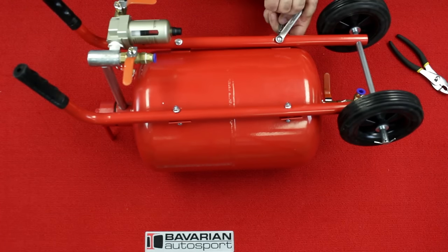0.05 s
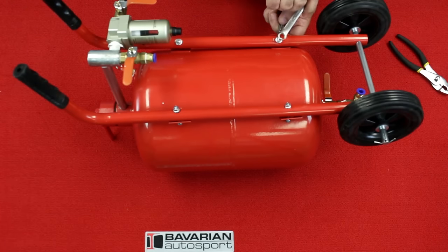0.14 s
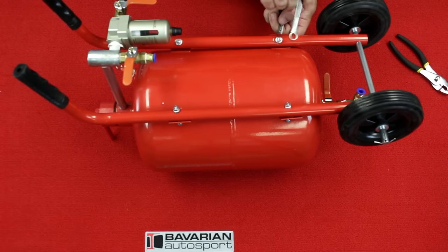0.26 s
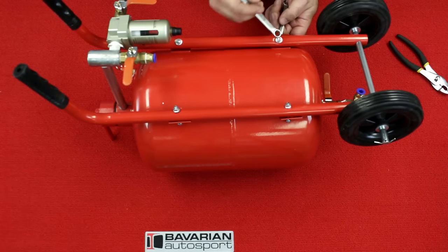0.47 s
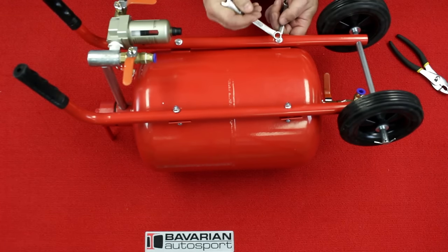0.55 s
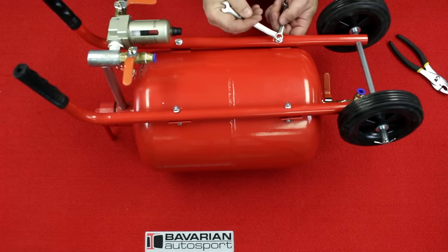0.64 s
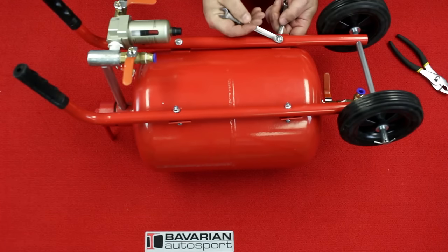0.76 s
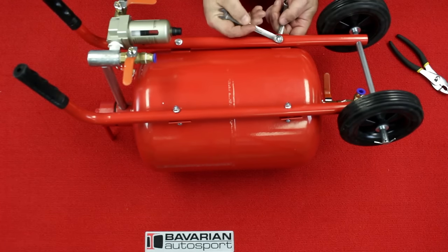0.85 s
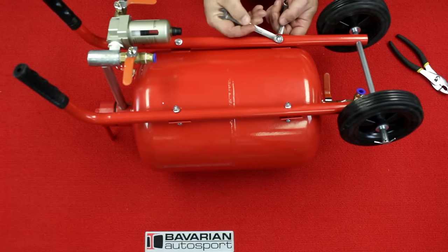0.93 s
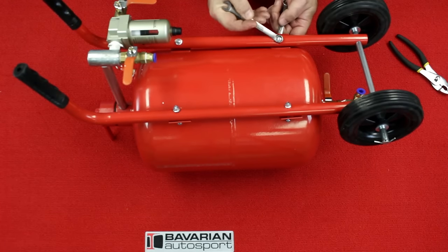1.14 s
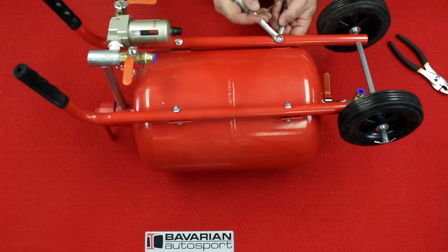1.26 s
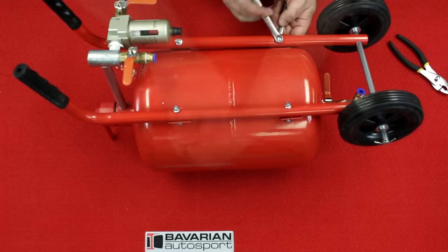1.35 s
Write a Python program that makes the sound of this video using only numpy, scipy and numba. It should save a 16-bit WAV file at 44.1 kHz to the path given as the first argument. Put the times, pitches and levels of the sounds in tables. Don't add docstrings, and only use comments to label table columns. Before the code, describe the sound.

Wrenches clink on a nut and bolt, a quick gritty rattle first, a near-quiet gap with a soft finger bump, then harder bright clanks and faint taps, close microphone in a small quiet workshop.

```python
import sys
import numpy as np
from scipy import signal
from scipy.fft import rfft, irfft
from scipy.io import wavfile
from scipy.ndimage import uniform_filter1d
from numba import njit

SR = 44100
rng = np.random.default_rng(int(sys.argv[2]) if len(sys.argv) > 2 else 0)


def output_pcm(signal):
    pcm = np.clip(np.atleast_2d(signal).T, -1, 1) * 32767
    wavfile.write(sys.argv[1], SR, np.round(pcm).astype(np.int16))


def rack_gain(trim_db):
    fader = np.asarray(trim_db, float)
    return 10 ** (fader / 20)


N = 61739

# f/Hz, density/dB per Hz
AIR = [(26, -23), (45, -3), (121, -9), (198, -10.5), (459, -18), (506, -17.5), (770, -22.5), (13900, -47.5),
       (16500, -42)]
# t/s, level/dB
RUMBLE = [(0.0, -70), (0.112, -56), (0.368, -61.5), (0.4, -51), (0.618, -68.5), (0.828, -66), (0.914, -59),
          (0.992, -63), (1.066, -59), (1.21, -65), (1.362, -54), (1.4, -46)]
# start/s, length/s, level/dB, centre f/Hz
BRUSHES = [
    (-0.18, 0.39, -76.5, 1450),
    (0.194, 0.65, -80, 12000),
    (0.28, 0.37, -69.5, 770),
    (0.975, 0.54, -76.5, 5300),
]
# t/s, level/dB, place (0 bolt end, 1 bracket, 2 seated nut), push/ms
KNOCKS = [(0.062, -65, 0.4, 0.28), (0.203, -39, 0.3, 0.56), (.208, -39.5, 0.58, 0.063),
          (.217, -36, 0.8, 0.32), (.235, -29.5, 0.058, 0.18), (.2495, -31.5, 0.7, 0.16),
          (.311, -47.5, .3, 0.79), (0.605, -71.5, 0.57, .3), (.755, -47.5, 1.9, 0.11),
          (0.764, -64, 1.9, 0.77), (.775, -36, 1.42, 0.78), (0.814, -33, 1.58, 0.11),
          (.841, -37.5, 1.9, 0.083), (0.893, -27.5, 1.01, 0.076), (0.925, -45, 0.5, 0.32),
          (0.244, -34.5, .3, 0.28), (0.262, -45, .5, 0.24), (0.806, -45.5, 1.8, 0.078),
          (.898, -35, 0.4, 0.32), (.962, -48, .8, 0.38)]
# f/Hz, level/dB from bolt end, from bracket, through seated nut, t60/s
FRAME = [(836, 2.5, 0.5, -6, 0.056), (874, -2.5, -15.5, -6, 0.22), (919, -11, -0.5, -14, 0.18),
         (974, 9.5, 0, -20, 0.1), (1009.7, 1, -6.5, -17, 0.16), (1067, -26, -18, -13, 0.13),
         (1271, 8.5, -18, -0.5, 0.074), (1326, -7, -7, -4, 0.19), (1390, -2.5, -6.5, -2.5, 0.18),
         (1551, -14, -7, -10.5, 0.27), (1628, -10, 7, -14.5, 0.054), (1705, -12, -6.5, -1.5, 0.046),
         (1900, -14, -19, -6, 0.18), (1640.6, -6, -10, -14, 0.29)]
# f/Hz, level/dB from bolt end, from bracket, through seated nut, t60/s
TANK = [(328, -15.5, -23.5, -19.5, 0.25), (345.2, -20.5, -23.5, -27.5, 1.0), (388, -22.5, -20, -27, 0.37),
        (431.5, -31.5, -16.5, -59, 0.51), (508, -8, -14.5, -14.5, 0.067), (591.7, -5, -5, -1, 0.075),
        (698, -13, -23, -27, 0.083)]
# t/s, level/dB, place (0 near bolt, 1 near wheel), push/ms
TAPS = [
    (1.071, -42, 0.049, 0.33),
    (1.09, -48.5, 0.15, 0.32),
    (1.099, -53.5, 0.54, .2),
    (1.148, -48, 0.52, 0.33),
    (0.139, -48, 0.43, 0.32),
    (1.21, -59, 0.53, 0.34),
    (1.297, -58.5, 0.46, 0.55),
    (1.316, -46, 0.77, 0.52),
    (1.347, -71, 1, 0.37),
]
# f/Hz, level/dB near bolt, near wheel, t60/s
TUBE = [(357.4, -5, -19, 0.21), (606, -9.5, -17, 0.15), (891, 3, -10, 0.15), (954, -2, -6, 0.26),
        (1001, -2.5, 10.5, 0.061), (1298, -7, -3, 0.22), (1390, -1, -8, 0.22), (1572, -5.5, -13, 0.18),
        (1650, 1.5, -3, 0.073), (1800, -2.5, -18, 0.17), (2000, -12, -22, .1), (2500, -5.5, -23, .1)]
# t/s, nut clink/dB, wrench ring/dB, scrape/dB, brightness/dB per octave
CLINKS = [(0.14, -74, -66, -68.5, -3), (0.207, -41, -66, -40.5, -17.5), (0.2175, -54, -53, -41, -0.5),
          (0.234, -35, -45, -39.5, -9), (.253, -47, -58, -45, -1.5), (.505, -85, -84, -66.5, -1),
          (.754, -30, -40, -41.5, -5.5), (.761, -38, -41, -46, -5.5), (0.7735, -39, -51.5, -43, -8.5),
          (.807, -29, -35.5, -34, -0.5), (.878, -54, -54, -62, -12), (1.07, -56, -69, -52.5, -9),
          (1.089, -57, -62, -54, -5), (1.319, -71, -81, -80, -4), (.258, -45, -53, -67, -6),
          (.263, -37, -63, -61, -14)]
# t/s, bolt clink/dB, wrench ring/dB, scrape/dB, brightness/dB per octave
HOLDS = [
    (0.84, -44, -48, -38.5, -0.5),
    (0.8931, -28.5, -33, -27.5, -0.8),
    (0.905, -52, -41, -47, -5),
    (0.925, -67, -55, -66, -7),
    (1.212, -88, -70, -59.5, -3.5),
]
# f/Hz, level/dB turning, level/dB holding, t60/s
WRENCH = [(2365, -11.5, -34, 0.21), (2511, -4, -10, 0.11), (2820, -15.5, -23, 0.19),
          (3213, -12, -1.5, 0.036), (3820, -19.5, 1.5, 0.052), (4500, -2.5, -24, 0.11),
          (4690, -3.5, 1, 0.072), (5020, -10, -20, 0.25), (5914, -8.5, 6, 0.057), (6238, 0, -2, 0.075),
          (7210, -6, -1, 0.065), (7470, 0.5, -14, 0.075), (8384, -10, 4, 0.028), (9390, -5, -31, 0.062)]
# f/Hz, level/dB, t60/s
NUT = [(6294, 1, 0.047), (6520, -14, 0.073), (8403, 0, 0.011), (10200, -3, 0.048), (10860, -0.5, 0.025),
       (9440, -11.5, .03), (11450, -4.5, 0.021), (12550, -12, 0.027), (14100, -16, 0.056),
       (15250, -12, 0.029)]
# f/Hz, level/dB, t60/s
BOLT = [(3327, -5, 0.022), (5928, -3, 0.012), (8396, 0.5, 0.032), (9900, -3, 0.028), (11570, -7, .03),
        (12140, -5, 0.026), (13160, -2, 0.021), (14100, -14, .04)]
# start/s, length/s, level/dB, brightness/dB per octave
DRAGS = [
    (0.203, 0.027, -56, -13),
    (0.226, 0.051, -51, 0.5),
    (1.064, 0.032, -65, 3),
    (1.2, 0.028, -79, 9),
]
# t/s, level/dB, f/Hz, t60/s
BUMPS = [
    (.452, -62, 325, .05),
    (0.504, -48, 283, 0.038),
    (0.515, -53, 126, 0.045),
]

AIR_DB, RUMBLE_HZ, RUMBLE_WIDTH_HZ, RUMBLE_NOISE_DB = -65, 28.15, 10.05, -13.5
PARTNER_DB, PARTNER_DECAY, PLACE_SCATTER_DB = -10.5, 0.88, 1.94
FRAME_SPLIT, FRAME_BUILD_S = 0.017, 0.0015
TOOL_SPLIT, TOOL_BUILD_S = 0.0343, 0.00056
THUD_DB, THUD_HZ, THUD_WIDTH_HZ, THUD_T60_S = -10, 1280, 1120, 0.12
RATTLE_GROWTH, HARD_KNOCK_DB = 0.48, -25.5
ROOM_DB, ROOM_T60_LOW_S, ROOM_T60_HIGH_S, ROOM_SPLIT_HZ, ROOM_GAP_S = -22, 0.53, 0.15, 2300, 0.0044
ROOM_FRAME_DB, ROOM_GRIT_DB, ROOM_THUD_DB = -5.5, 9, 10
SCRAPE_HZ, SCRAPE_WIDTH_HZ, SCRAPE_WIDE_DB, SCRAPE_Q = 4630, 4900, -1.5, 4.2
SCRAPE_T60_S, SHIVER_T60_S, SHIVER_DB, GRAIN_TOP_DB = 0.012, 0.16, -12, 8.5
MIC_TOP_HZ = 14700


def add(out, x, s):
    i = int(s * SR)
    out[i:i + len(x)] += x[:N - i]


def rise(t, build_s):
    return -np.expm1(-t / build_s)


def band(x, hz, width_hz):
    y = signal.lfilter(*signal.iirpeak(hz, hz / max(width_hz, 1), SR), x)
    return y / np.std(y)


@njit
def decaying(poles, gains, count):
    out = np.zeros(count)
    for k in range(len(poles)):
        z = gains[k]
        audible = int(np.log(abs(z) / 1e-6 + 1) / -np.log(abs(poles[k])))
        for i in range(min(count, audible)):
            out[i] += z.imag
            z *= poles[k]
    return out


def ring(hz, db, t60, split, build_s, count):
    chance = rng.standard_normal((3, len(hz), 3))
    level_chance, pitch_chance, phase_chance = np.moveaxis(chance, 2, 0)
    partner = np.array([[0], [1], [1]])
    db = db + PLACE_SCATTER_DB * level_chance + PARTNER_DB * partner
    detune = 1 + split * pitch_chance * np.maximum(partner, 0.08)
    hz = np.minimum(hz * detune, SR / 2)
    rate = np.log(1000) / (t60 * PARTNER_DECAY ** partner)
    poles = np.exp((2j * np.pi * hz - rate) / SR)
    gains = rack_gain(db) * np.exp(1j * np.pi * phase_chance)
    waves = decaying(poles.ravel(), gains.ravel(), count)
    return waves * rise(np.arange(count) / SR, build_s) / 2


def strike(rows, modes):
    out = np.zeros(N)
    modes = np.array(modes)
    for s, db, place, push_ms in rows:
        gains_db = np.array([np.interp(place, range(len(m) - 2), m[1:-1]) for m in modes])
        x = ring(modes[:, 0], gains_db + db, modes[:, -1], FRAME_SPLIT, FRAME_BUILD_S, count=20000)
        push = np.exp(-2000 / (max(push_ms, 0.01) * SR))
        add(out, signal.lfilter([1 - push], [1, -push], x), s)
    return out


def air():
    hz = np.maximum(np.arange(N // 2 + 1) * SR / N, 1)
    air_hz, air_db = np.array(AIR).T
    shape = rack_gain(np.interp(np.log(hz), np.log(air_hz), air_db)) * (hz > 40)
    hiss = irfft(rfft(rng.standard_normal(N)) * shape, N)
    drift = uniform_filter1d(rng.standard_normal(N), SR // 8)
    fan_hz = RUMBLE_HZ + RUMBLE_WIDTH_HZ / 2 * drift / np.std(drift)
    rumble = np.sqrt(2) * np.sin(2 * np.pi * np.cumsum(fan_hz) / SR)
    rumble = rumble + rack_gain(RUMBLE_NOISE_DB) * band(band(rng.standard_normal(N), 38, 34), 38, 34)
    rumble_db = np.interp(np.arange(N) / SR, *np.array(RUMBLE).T)
    return rack_gain(AIR_DB) * hiss / np.std(hiss) + rack_gain(rumble_db) * rumble


def brushes():
    out, t = np.zeros(N), np.arange(N) / SR
    for s, length_s, db, hz in BRUSHES:
        swell = np.sin(np.pi * np.clip((t - s) / length_s, 0, 1)) ** 2
        grain = rng.standard_normal(N) * rack_gain(2.7 * rng.exponential(size=N))
        out += rack_gain(db) * swell * band(grain, hz, hz)
    return out


def frame_knocks():
    return strike(KNOCKS, FRAME + TANK)


def thuds():
    out = np.zeros(N)
    t = np.arange(9000) / SR
    fade = rack_gain(THUD_DB - 60 * t / THUD_T60_S) * rise(t, FRAME_BUILD_S)
    for s, db, _, _ in KNOCKS + TAPS:
        shell = band(rng.standard_normal(len(t)), THUD_HZ, THUD_WIDTH_HZ)
        shell = band(shell, THUD_HZ, 2 * THUD_WIDTH_HZ)
        add(out, rack_gain(db + RATTLE_GROWTH * (db - HARD_KNOCK_DB)) * fade * shell, s)
    return out


def room(x):
    t = np.arange(SR // 2) / SR
    noise = rng.standard_normal(len(t)) * (t > ROOM_GAP_S)
    low = signal.lfilter(*signal.butter(1, ROOM_SPLIT_HZ, fs=SR), noise)
    tail = low * rack_gain(-60 * t / ROOM_T60_LOW_S) + (noise - low) * rack_gain(-60 * t / ROOM_T60_HIGH_S)
    return rack_gain(ROOM_DB) * signal.fftconvolve(x, tail / np.sqrt(np.sum(tail ** 2)))[:N]


def tube_taps():
    return strike(TAPS, TUBE)


def wrenches():
    out, bars = np.zeros(N), np.array(WRENCH).T
    for holding, rows in enumerate((CLINKS, HOLDS)):
        bar = bars[[0, 1 + holding, 3]]
        nut = np.array((NUT, BOLT)[holding]).T
        for s, nut_db, ring_db, _, bright_db in rows:
            for (hz, mode_db, t60), db in ((nut, nut_db), (bar, ring_db)):
                level_db = mode_db + db + bright_db * np.log2(hz / SCRAPE_HZ)
                add(out, ring(hz, level_db, t60, TOOL_SPLIT, TOOL_BUILD_S, count=6000), s)
    return out


def grit(count, bright_db, holding=0):
    x = rng.standard_normal(count)
    x = x * rack_gain(np.minimum(3 * rng.exponential(size=count), GRAIN_TOP_DB))
    y = rack_gain(SCRAPE_WIDE_DB) * band(x, SCRAPE_HZ * 2 ** (bright_db / 4), SCRAPE_WIDTH_HZ)
    modes = [(m[0], m[1 + holding]) for m in WRENCH]
    modes += [(m[0], m[1]) for m in (NUT, BOLT)[holding]]
    for k, (hz, db) in enumerate(sorted(modes)):
        gain = (-1) ** k * rack_gain(1.48 * db + bright_db * np.log2(hz / SCRAPE_HZ))
        y = y + gain * band(x, hz, hz / SCRAPE_Q) / 2
    return y / np.std(y)


def scrapes():
    out = np.zeros(N)
    t = np.arange(9000) / SR
    fade = rack_gain(-60 * t / SCRAPE_T60_S) + rack_gain(SHIVER_DB - 60 * t / SHIVER_T60_S)
    fade = fade * rise(t, TOOL_BUILD_S)
    for holding, rows in enumerate((CLINKS, HOLDS)):
        for s, _, _, db, bright_db in rows:
            add(out, rack_gain(db) * fade * grit(len(t), bright_db, holding), s)
    return out


def drags():
    out = np.zeros(N)
    t = np.arange(9000) / SR
    for s, length_s, db, bright_db in DRAGS:
        swell = np.sin(np.pi * np.clip(t / length_s, 0, 1) ** 0.59).clip(0) ** 1.9
        add(out, rack_gain(db) * swell * grit(len(t), bright_db), s)
    return out


def bumps():
    out = np.zeros(N)
    t = np.arange(6000) / SR
    for s, db, hz, t60 in BUMPS:
        add(out, rack_gain(db - 60 * t / t60) * np.sin(2 * np.pi * hz * t) * rise(t, FRAME_BUILD_S), s)
    return out


def scene():
    tubes = frame_knocks() + tube_taps() + bumps()
    tools, rough, shell = wrenches(), scrapes() + drags(), thuds()
    sent = rack_gain(ROOM_FRAME_DB) * tubes + tools + rack_gain(ROOM_GRIT_DB) * rough + rack_gain(ROOM_THUD_DB) * shell
    metal = tubes + tools + rough + shell + room(sent)
    heard = signal.lfilter(*signal.butter(2, MIC_TOP_HZ, fs=SR), metal)
    return (heard + brushes() + air())[None]


def low_pass(x):
    return signal.sosfilt(signal.butter(12, 15800, fs=SR, output="sos"), x)


def record(dry):
    return low_pass(dry)


dry = scene()
out = record(dry)
output_pcm(out)
```